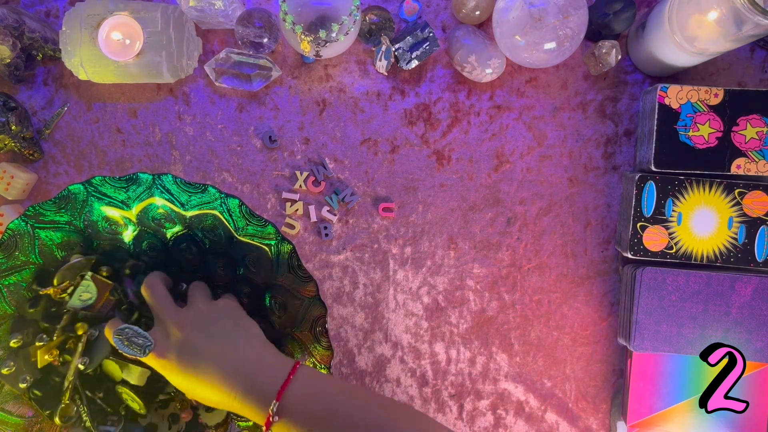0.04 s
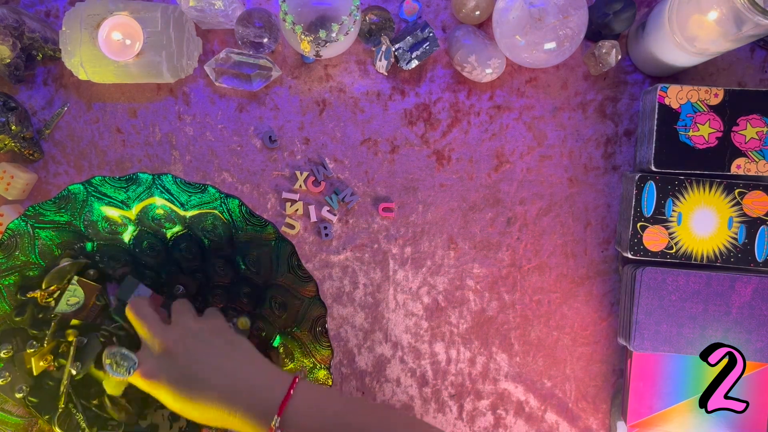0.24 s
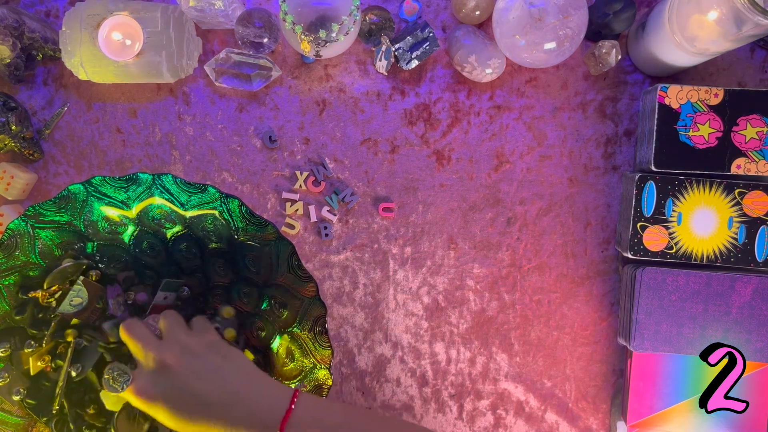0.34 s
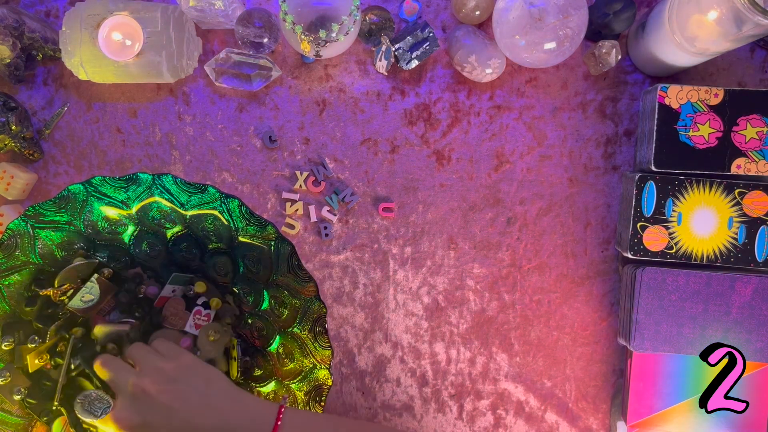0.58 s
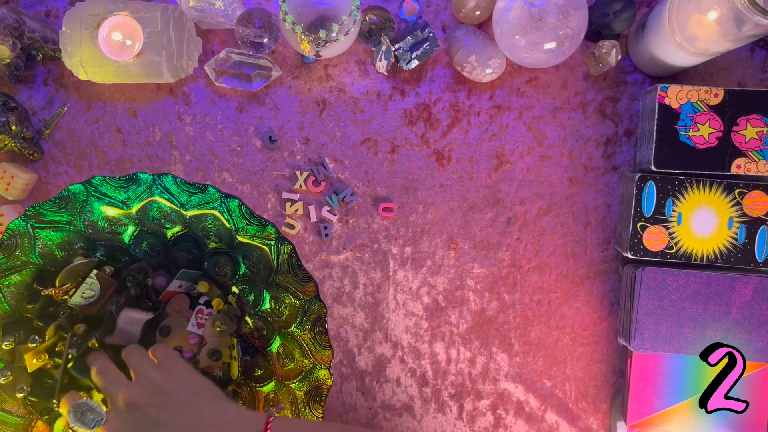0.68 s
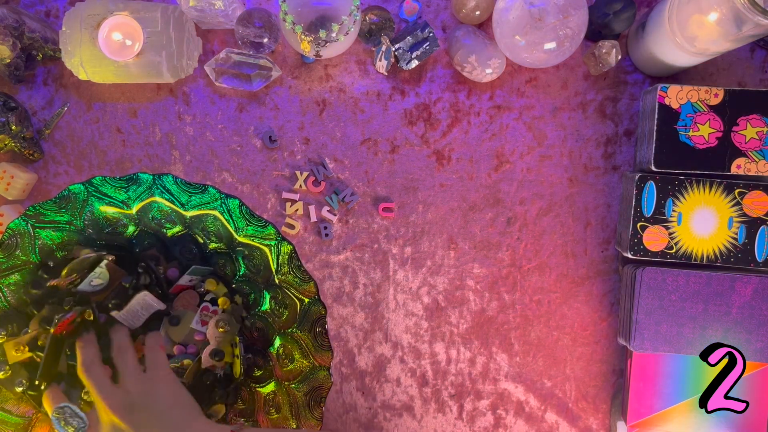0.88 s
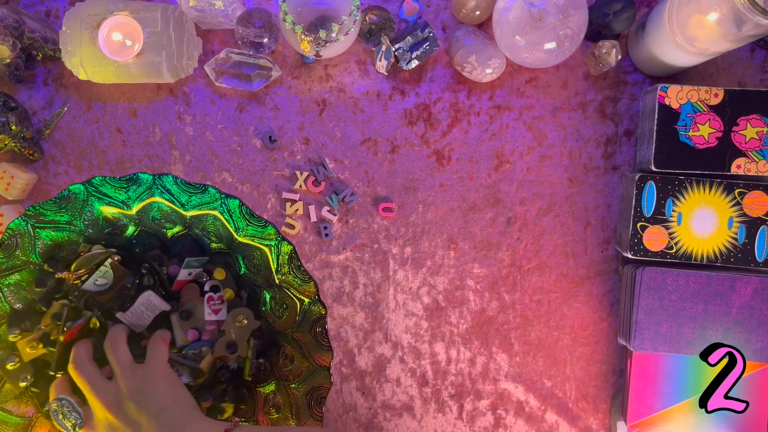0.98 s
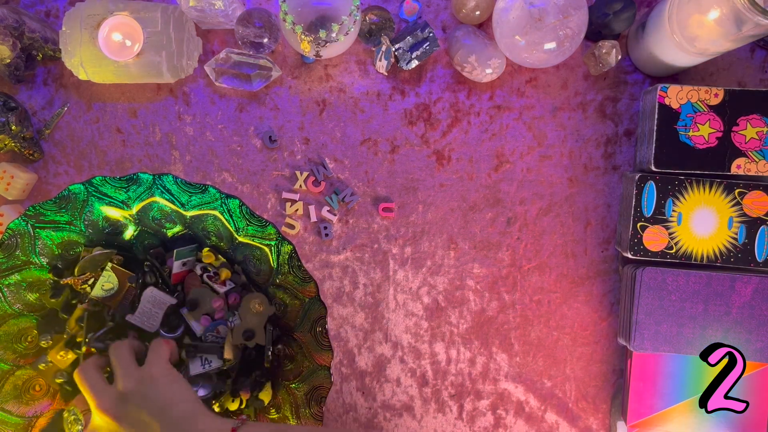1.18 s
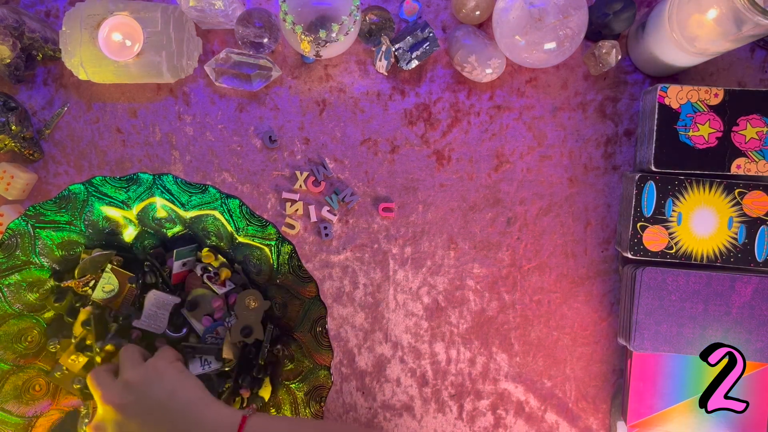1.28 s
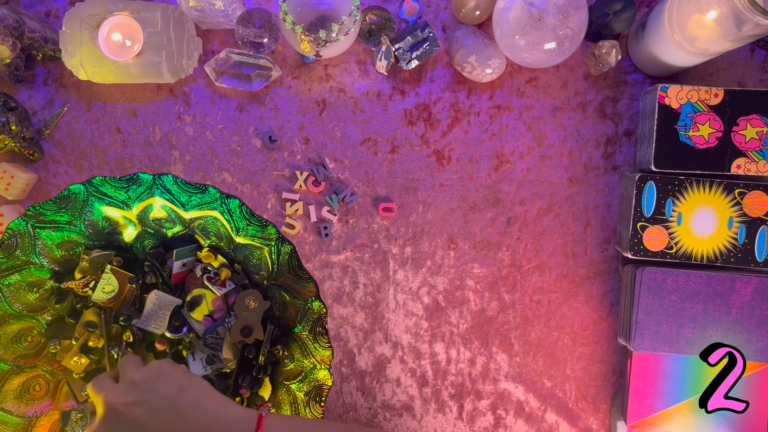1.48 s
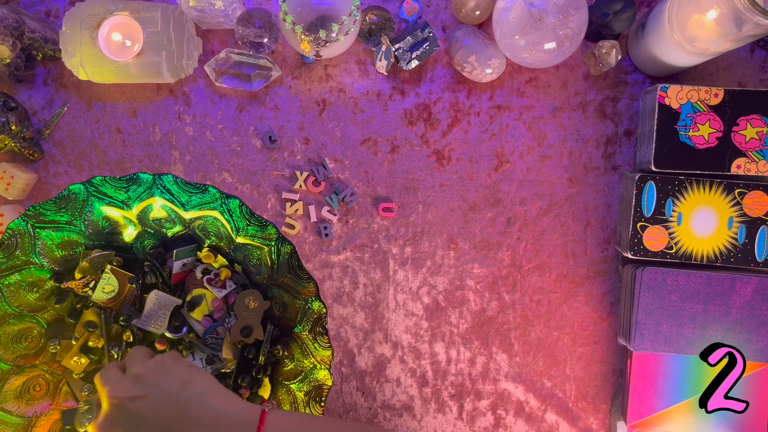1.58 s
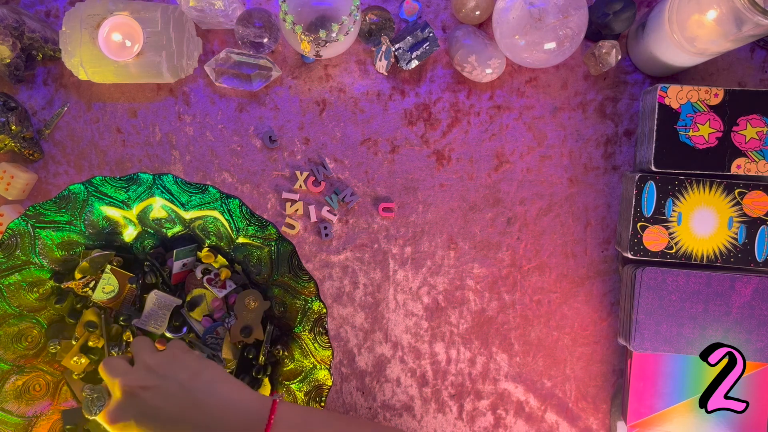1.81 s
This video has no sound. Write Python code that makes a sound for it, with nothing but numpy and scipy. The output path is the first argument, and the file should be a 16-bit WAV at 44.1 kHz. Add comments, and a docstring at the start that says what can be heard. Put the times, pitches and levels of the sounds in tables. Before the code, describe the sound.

Metal charms jingle and scrape in a glass dish, stirred by hand, then settle.

```python
"""First comes a light rattle: a hand stirs small metal charms in a glass dish, close by in a small room.
Charms hit each other and ring with bright clinks. At the bottom they knock and scrape on the glass,
which rings lower, and the dish bumps softly on the table. The hand slows, the last charms slip with
tiny scratches, and one topples and chatters to rest. Each ring is a set of fading tones, or "modes"."""
import sys
import numpy as np
from scipy import signal
from scipy.fft import rfft, irfft
from scipy.io import wavfile

SR = 44100
rng = np.random.default_rng(int(sys.argv[2]) if len(sys.argv) > 2 else 0)


def int16_out(signal):
    """Quantize to a 16-bit WAV file."""
    q = np.round(np.clip(np.atleast_2d(signal).T, -1, 1) * 32767)
    wavfile.write(sys.argv[1], SR, q.astype(np.int16))


N = 81585
T = np.arange(N) / SR
RING_T = T[:16384]  # time within one short sound

# Levels are relative within each table; t60 is the time a sound takes to fade by 60 dB.
# tone colour of the quiet room: f/Hz, level/dB
ROOM_SPECTRUM = [(18, -29.5), (30, 8.5), (253, -9.5), (460, -19), (815, -20.5), (1600, -12.5),
                 (6880, -15.5), (15000, -29)]
# tone colour of the pushed dish's rumble: f/Hz, level/dB
RUMBLE_SPECTRUM = [(15, -30), (25, -9.5), (49, -8.5), (103, 9), (166, -0.5), (205, 6), (284, -11.5),
                   (384, 1), (425, -33), (500, -24), (650, -36), (1100, -120)]
# loudness of that rumble: t/s, level/dB
RUMBLE_LEVELS = [(0.0, -64.5), (0.174, -71.5), (0.648, -54.5), (0.828, -68.5), (1.174, -50.5),
                 (1.386, -75.5), (1.55, -67.5), (1.85, -88)]
# soft bumps of the dish on the table: t/s, level/dB, f/Hz
DISH_BUMPS = [(0.418, -56, 122.6), (0.469, -56, 104), (0.608, -51, 209), (0.627, -52, 113),
              (0.999, -54, 257), (1.058, -66, 84), (1.127, -59, 116), (1.161, -53, 203)]
# modes of the filled glass dish: f/Hz, knocked level/dB, t60/s, rubbed level/dB
GLASS_MODES = [(386, -11, 0.27, -22), (816, -1, 0.078, 1), (903.5, -5, 0.075, -5), (1031, -10, 0.28, -13.5),
               (1320, -15, 0.091, -23), (1476, -6.5, 0.13, -3.5), (1574, -5, 0.036, -0.5),
               (2195, 0, 0.044, -6), (2882, 4.5, 0.11, -5), (3560, -3, 0.07, 1.5), (3760, -8, 0.035, 4.5),
               (4060, -1, 0.076, -6), (5356, 5, 0.062, -0.5), (5400, -11, 0.056, -9), (6390, 9, 0.044, -10)]
# the heap sliding on the glass: t/s, level/dB
SLIDE_LEVELS = [(0.0, -60), (0.122, -67.5), (0.438, -52.5), (0.462, -61), (0.592, -50), (0.684, -51),
                (0.704, -39), (0.85, -60), (0.906, -49), (1.2, -48), (1.35, -79), (1.53, -73.5),
                (1.85, -88)]
# charms pressed along the bare bottom: t/s, level/dB
PRESS_LEVELS = [(.68, -67), (.71, -41.5), (.76, -47), (.785, -41.5), (.865, -50.5), (.895, -36.5),
                (.92, -39), (.955, -46), (.985, -40.5), (1.04, -48.5), (1.07, -50), (1.105, -52.5),
                (1.17, -39), (1.24, -80), (1.265, -49), (1.295, -52.5), (1.315, -87)]
# tone colour of the gritty sliding noise: f/Hz, level/dB
GRIT_SPECTRUM = [(150, -35.5), (400, -9), (650, -9), (850, -21), (1150, -12.5), (1600, -8), (2500, -2),
                 (5000, -32)]
# knocks on the glass: t/s, level/dB, middle of the ringing range f/Hz, its width/octaves
GLASS_KNOCKS = [(.698, -29, 815, 0.38), (.703, -28, 2690, 0.2), (.732, -27, 1200, 1.3),
                (.745, -23, 2190, 0.35), (.755, -27.5, 2400, 0.47), (.7965, -18.5, 3650, 0.34),
                (.800, -28, 3500, 0.3), (.815, -29, 3600, 0.25), (.975, -32, 2290, 1.34),
                (1.057, -39.5, 1940, 0.65), (1.122, -28.5, 2890, 0.8), (1.168, -41, 2200, 1.9),
                (1.276, -46, 1470, 0.04)]
# slips of settling charms: t/s, level/dB, time to the peak/s, upper limit f/Hz
SLIPS = [(1.321, -54, 0.0059, 5000), (1.349, -57.5, 0.0031, 6900), (1.382, -56, 0.007, 12000),
         (1.395, -58, .009, 8000), (1.433, -58, 0.0082, 5100), (1.471, -57.5, 0.0056, 5500),
         (1.499, -53, 0.005, 12000), (1.514, -49, 0.0069, 10200), (1.587, -52.5, 0.011, 7150),
         (1.656, -65.5, 0.0087, 5970), (1.71, -50.5, 0.0062, 13000), (1.734, -56.5, 0.0058, 6000)]
# tone colour of a slip: f/Hz, level/dB
SLIP_SPECTRUM = [(200, -15), (550, -6.5), (1800, -8.5), (2700, 1.5), (3400, -11), (4400, 0), (6500, 5.5),
                 (8000, -3), (15000, 5)]
# taps muffled by the fingers: t/s, level/dB, middle f/Hz
DULL_TAPS = [(0.19, -45, 3300), (0.660, -39.5, 2400), (1.3, -57, 605), (1.324, -59, 2440),
             (1.502, -60.5, 897), (1.527, -63, 570)]
# modes of one loose charm: f/Hz, level/dB, t60/s
LOOSE_CHARM_MODES = [(2537, 1, 0.037), (2625, -10.5, 0.031), (4560, -21, 0.027), (5840, -4, 0.039),
                     (6580, -7, 0.031), (7390, -6, 0.036), (8800, -1.5, 0.072), (10950, -3, 0.083),
                     (14810, -10, 0.046)]
# its bounces: t/s, level/dB, upper limit f/Hz
BOUNCES = [(1.505, -61, 2800), (1.533, -55, 3500), (1.542, -51.5, 3840), (1.549, -52, 3800),
           (1.567, -55.5, 9100), (1.577, -40.5, 14200), (1.588, -42.5, 9500), (1.598, -49.5, 7140),
           (1.612, -50, 5030)]
# modes of a larger charm: f/Hz, level/dB, t60/s
LARGE_CHARM_MODES = [(2683, 0, 0.015), (3130, -2, 0.0091), (3250, 3.5, 0.01), (3490, -0.5, .025)]
# modes of a typical small charm: f/Hz, level/dB, t60/s
SMALL_CHARM_MODES = [(4320, 0, 0.05), (4452, -4.5, 0.029), (5006, -0.5, 0.026), (5780, 0, 0.028),
                     (6410, -2.5, 0.062), (6630, -3.5, 0.073), (7360, -16.5, 0.11), (8530, -5.5, 0.057),
                     (10040, -2.5, 0.043), (11760, 3, 0.05), (13500, 0, 0.055), (14170, -1.5, 0.099)]
# tone colour of the crack when metal meets metal: f/Hz, level/dB
CRACK_SPECTRUM = [(900, -22), (2100, -14.5), (3700, -4.5), (4330, -1), (4900, -8.5), (6650, -3.5),
                  (10700, -16), (14600, -5.5), (15500, -12)]
# rattle of the stirred heap: t/s, body level/dB, top octave level/dB
RATTLE_LEVELS = [(0, -35, -43.5), (.05, -52.5, -60), (.185, -50, -59), (.21, -38.5, -60), (.278, -28, -44),
                 (.295, -25.5, -36), (.35, -24, -34.5), (.41, -26.5, -43), (.435, -43, -25),
                 (.48, -26.5, -50), (.56, -36, -49), (.63, -27, -41), (.655, -40.5, -49),
                 (.75, -31.5, -37.5), (.865, -45, -75), (.905, -30, -47), (1.045, -38.5, -42),
                 (1.065, -27, -39), (1.112, -35, -38.5), (1.13, -28, -24.5), (1.175, -23, -37.5),
                 (1.222, -38.5, -44), (1.29, -43.5, -45), (1.34, -67, -100), (1.47, -62, -75),
                 (1.58, -51, -73), (1.64, -63.5, -82), (1.725, -68.5, -71), (1.85, -72, -93)]
# clear clinks of charm on charm: t/s, body level/dB, top octave level/dB, main pitch f/Hz
CHARM_CLINKS = [(0.136, -35.5, -48, 5270), (0.2015, -22, -41, 6700), (0.2118, -20.5, -40, 6596),
                (0.2206, -31, -42, 6780), (0.2427, -29, -62, 6600), (0.289, -17.5, -23, 6780),
                (0.3127, -19, -39, 5730), (0.3228, -12, -56, 4470), (0.3317, -26, -22, 4300),
                (0.3417, -22, -21.5, 4020), (0.3485, -14, -44, 4450), (0.3588, -20.5, -54, 7240),
                (0.3999, -29, -34, 8300), (0.4255, -20.5, -17.5, 4350), (0.4324, -16, -25, 7220),
                (0.4405, -24, -25, 7150), (0.4455, -14.5, -41, 5230), (0.453, -24, -46, 4360),
                (0.4858, -14.5, -51, 4315), (0.5006, -14.5, -27, 4430), (0.5205, -18.5, -37, 6270),
                (0.5335, -21, -43, 4510), (0.585, -21.5, -35, 5220), (0.626, -21.5, -66, 4354),
                (0.6311, -20, -44.5, 4310), (0.661, -22.5, -53, 4460), (0.6668, -16, -48, 4777),
                (0.6715, -31, -23.5, 4960), (0.6973, -22.5, -26.5, 4840), (0.732, -37, -36, 6400),
                (0.7467, -16.5, -26.5, 3640), (0.7564, -19, -38.5, 5630), (0.795, -31, -28, 4085),
                (0.9697, -21, -57, 4310), (0.9834, -18, -36, 3717), (1.0564, -21.5, -54, 3990),
                (1.0694, -22.5, -43, 5800), (1.12, -13.5, -30, 6500), (1.1253, -22.5, -38, 6500),
                (1.1338, -13, -32, 6770), (1.1445, -25, -32, 6200), (1.156, -12.5, -39, 6240),
                (1.1687, -16, -38, 6840), (1.1734, -23, -35, 6050), (1.2, -24, -48, 3880),
                (1.2305, -30, -33, 8000), (1.262, -26, -44, 3660), (1.2755, -28.5, -43, 8200),
                (1.781, -41, -71.5, 6230), (1.794, -45.5, -77, 4520)]

CONTACTS_PER_S, CONTACT_RISE_S = 950, 0.0006
SMALL_LOW_CUT_HZ, LOW_CUT_HZ = 3800, 2050  # for the small charms; for the loose and the larger one


def undb(db):
    """Turn decibels into a factor to multiply by."""
    return 10 ** (np.asarray(db) / 20)


def unit(x):
    """Scale to an average strength (rms) of 1."""
    return x / np.sqrt(np.mean(x ** 2) + 1e-30)


def unit_hit(x):
    """Scale a hit to rms 1 over its first 5 ms."""
    return x / np.sqrt(np.mean(x[:SR // 200] ** 2) + 1e-30)


def unit_energy(x):
    """Scale to a total energy of 1."""
    return x / np.linalg.norm(x)


def fade(t60):
    """Die away by 60 dB every t60 seconds."""
    return np.exp(-np.log(1000) * RING_T / t60)


def rise(seconds):
    """Climb smoothly from 0 towards 1."""
    return 1 - np.exp(-RING_T / seconds)


def choke(seconds):
    """Hold for a moment, then drop fast, like a ring stopped by a touch."""
    return np.exp(-(RING_T / seconds) ** 2)


def swell(rise_s):
    """Speed of a short slip: it peaks after rise_s, then friction stops it."""
    u = RING_T / rise_s
    return u * np.exp((1 - u ** 2) / 2)


def curve(rows, column=1):
    """Loudness factor over time from one dB column of a table."""
    rows = np.array(rows)
    return undb(np.interp(T, rows[:, 0], rows[:, column]))


def colour(x, spectrum):
    """Give a sound the tone colour set by rows of f/Hz, level/dB."""
    hz, db = np.array(spectrum).T
    f = np.maximum(np.fft.rfftfreq(len(x), 1 / SR), 1)
    gain = undb(np.interp(np.log(f), np.log(hz), db))
    return unit(irfft(rfft(x) * gain, len(x)))


def noise(spectrum, size=len(RING_T)):
    """Noise with a chosen tone colour."""
    return colour(rng.standard_normal(size), spectrum)


def butter(x, hz, kind, order=4):
    """Keep the "low" part, the "high" part or a "band" of a sound."""
    sections = signal.butter(order, np.clip(hz, 10, .45 * SR), kind, fs=SR, output="sos")
    return signal.sosfilt(sections, x)


def through(x, response):
    """Let every sample of x set off its own copy of the response."""
    return signal.fftconvolve(x, response)[:N]


def add(out, s, x):
    """Mix x into out at s seconds."""
    i = min(max(int(s * SR), 0), N - 1)
    out[i:i + len(x)] += x[:N - i]


def ring(hz, db, t60):
    """Add up fading tones, each starting up or down at random."""
    signs = rng.choice([-1, 1], len(hz))
    return sum(sign * undb(level) * np.sin(2 * np.pi * f * RING_T) * fade(decay)
               for f, level, decay, sign in zip(hz, db, t60, signs))


def contacts(per_s, size=N):
    """Tiny clicks at random times and of uneven strength."""
    hit = rng.random(size) < per_s / SR
    strength = undb(4 * np.clip(rng.standard_normal(size), -2, 2))
    return hit * strength * rng.choice([-1, 1], size)


def rebounds(x, per_s, db, t60):
    """A struck charm chatters: a quick, fading burst of repeats follows the hit."""
    burst = undb(db) * contacts(per_s, len(RING_T)) * fade(t60)
    return x + signal.fftconvolve(x, burst)[:len(x)]


def metal_hit(ringing, crack_db, low_hz):
    """A hit on thin metal: a crack plus ringing, with little below the lowest mode."""
    crack = unit_hit(noise(CRACK_SPECTRUM) * fade(t60=0.011))
    hit = unit_hit(ringing) + undb(crack_db) * crack
    return butter(hit * rise(CONTACT_RISE_S), low_hz, "high", order=5)


def room(sound, delay_s=0.0095):
    """The small room adds a short echo and its own faint, steady noise."""
    tail = butter(rng.standard_normal(len(RING_T)), 7500, "low", order=1)
    tail = tail * fade(t60=0.085) * (RING_T > delay_s)
    echo = through(sound, unit_energy(tail))
    return sound + undb(-14.5) * echo + undb(-84) * noise(ROOM_SPECTRUM, N)


def dish_on_table():
    """The pushed dish rumbles and bumps on the tablecloth."""
    out = noise(RUMBLE_SPECTRUM, N) * curve(RUMBLE_LEVELS) * undb(-5)
    for s, db, hz in DISH_BUMPS:
        bump = 2 * np.sin(2 * np.pi * hz * RING_T) * fade(t60=0.18) * rise(0.0027)
        add(out, s, undb(db) * bump)
    return out


def glass_scrape(count=12):
    """Charms stick and slip: the heap sounds the glass's low modes, pressed charms its high ones."""
    out = np.zeros(N)
    sliding = curve(SLIDE_LEVELS) * undb(-3)
    pressing = curve(PRESS_LEVELS) * undb(1.5)
    hz, _, t60, db = np.array(GLASS_MODES).T
    low = hz < 1200
    detune = np.where(low, 0.04, 0.014)  # the heap's shifting weight moves the low modes most
    for _ in range(count):
        load, place = rng.standard_normal((2, len(hz)))
        modes = np.array([hz * (1 + detune * load), db + 2.9 * place, t60])
        grit = unit_energy(butter(noise(GRIT_SPECTRUM) * fade(t60=0.029), 220, "high", order=2))
        hum = unit_energy(ring(*modes[:, low]))
        sing = unit_energy(ring(*modes[:, ~low]))
        slips = unit(contacts(1200 / count))
        out += through(slips * sliding, hum + grit) + through(slips * pressing, sing)
    return out / np.sqrt(count)


def glass_knocks():
    """Charms hit the glass; where and how hard they land decides which modes ring."""
    out = np.zeros(N)
    hz, db, t60, _ = np.array(GLASS_MODES).T
    shape = rise(0.0012) * choke(0.047)  # the heap falls back on the glass and stops the ring
    for s, level_db, centre_hz, octaves in GLASS_KNOCKS:
        weight_db = -10 * np.log10(1 + (np.log2(hz / centre_hz) / octaves) ** 4)
        clack = noise(np.c_[hz, weight_db]) * fade(t60=0.075)
        clack = butter(clack, [hz[0], hz[-1]], "band", order=2)
        knock = unit_hit(ring(hz, db + weight_db, t60)) + undb(-12.5) * unit_hit(clack)
        add(out, s, undb(level_db) * knock * shape)
    return out


def settling_slips():
    """Each slip of a settling charm is a soft scratch made of tiny catches."""
    out = np.zeros(N)
    hz, colour_db = np.array(SLIP_SPECTRUM).T
    for s, db, rise_s, limit_hz in SLIPS:
        place_db = 4 * rng.standard_normal(len(hz))  # every spot of the heap sounds different
        catches = contacts(per_s=2000, size=len(RING_T))
        scratch = colour(catches, np.c_[hz, colour_db + place_db])
        scratch = unit(butter(scratch, limit_hz, "low", order=2))
        add(out, s, undb(db) * scratch * swell(rise_s))
    return out


def muffled_taps():
    """Charms held by the fingers tap without ringing."""
    out = np.zeros(N)
    for s, db, hz in DULL_TAPS:
        burst = rng.standard_normal(len(RING_T)) * fade(t60=0.024)
        tap = butter(burst, [hz / 1.076, hz * 1.106], "band", order=2)
        add(out, s, undb(db) * unit_hit(tap))
    return out


def loose_charm():
    """A last charm topples and chatters to rest; each bounce is a quick burst of hits."""
    out = np.zeros(N)
    hz, db, t60 = np.array(LOOSE_CHARM_MODES).T
    for s, level_db, limit_hz in BOUNCES:
        detune, place = rng.standard_normal((2, len(hz)))
        ringing = ring(hz + 50 * detune, db + 3 * place, t60)
        hit = metal_hit(ringing, crack_db=-2, low_hz=LOW_CUT_HZ)
        bounce = rebounds(hit, per_s=1500, db=-5, t60=0.05) * choke(0.016)  # its neighbours stop it
        add(out, s, undb(level_db) * unit_hit(butter(bounce, limit_hz, "low", order=2)))
    return out


def large_charm(start_s=0.298):
    """A larger charm is dragged across the others and jingles at a lower pitch."""
    out = np.zeros(N)
    jingle = through(contacts(CONTACTS_PER_S), ring(*np.array(LARGE_CHARM_MODES).T))
    jingle = butter(jingle, LOW_CUT_HZ, "high")[:len(RING_T)]
    add(out, start_s, undb(-36) * unit(jingle) * swell(rise_s=0.04))
    return out


def small_charm(split_hz=8370):
    """A charm of random size is struck once: returns the body of its sound and the top octave."""
    hz, db, t60 = np.array(SMALL_CHARM_MODES).T
    size, place = rng.standard_normal((2, len(hz)))
    spread = 0.015 * hz / hz[0]  # charms differ most in their higher modes
    ringing = ring(hz * (1 + spread * size), db + 4 * place, t60)
    hit = metal_hit(ringing, crack_db=4, low_hz=SMALL_LOW_CUT_HZ)
    return unit_hit(butter(hit, split_hz, "low")), unit_hit(butter(hit, split_hz, "high"))


def rattle(count=24):
    """Many charms jostle lightly as the fingers stir the heap."""
    out = np.zeros(N)
    body_gain = curve(RATTLE_LEVELS) * undb(-11)
    top_gain = curve(RATTLE_LEVELS, column=2) * undb(-4.5)
    for _ in range(count):
        hits = unit(contacts(CONTACTS_PER_S / count))
        for part, gain in zip(small_charm(), (body_gain, top_gain)):
            out += through(hits * gain, unit_energy(part))
    return out / np.sqrt(count)


def clinks():
    """Charm hits charm and rings; each clink has its own loudness, brightness and main pitch."""
    out = np.zeros(N)
    for s, body_db, top_db, pitch_hz in CHARM_CLINKS:
        body, top = (unit_hit(rebounds(part, per_s=500, db=-3, t60=0.043)) for part in small_charm())
        ping = unit_hit(ring([pitch_hz], db=[0], t60=[0.059]) * rise(CONTACT_RISE_S))
        body = unit_hit(body + undb(1.5) * ping)
        add(out, s, undb(body_db - 14.5) * body + undb(top_db - 9) * top)
    return out


def scene():
    """Mix the charms, the glass and the table in the room, as one channel."""
    charms = clinks() + rattle() + large_charm() + muffled_taps() + settling_slips() + loose_charm()
    glass = butter(glass_knocks() + glass_scrape(), 180, "high", order=2)
    return room(charms + glass + dish_on_table())[None]


def record(dry, top_hz=15750):
    """Cut away the very highest treble."""
    return signal.sosfilt(signal.ellip(10, .2, 80, top_hz, fs=SR, output="sos"), dry)


dry = scene()
out = record(dry)
int16_out(out)
```